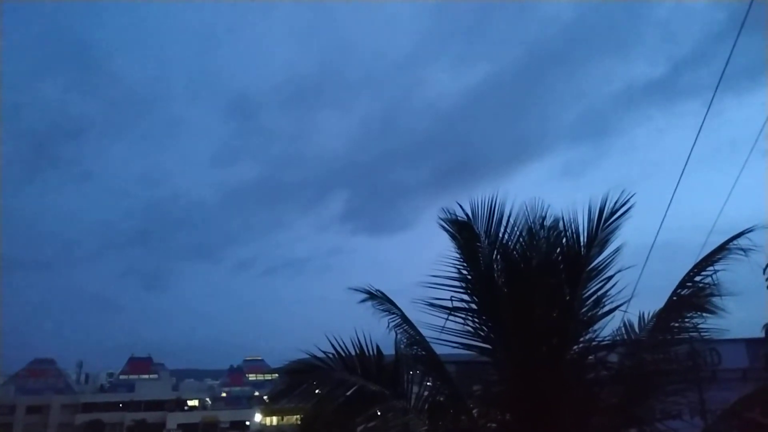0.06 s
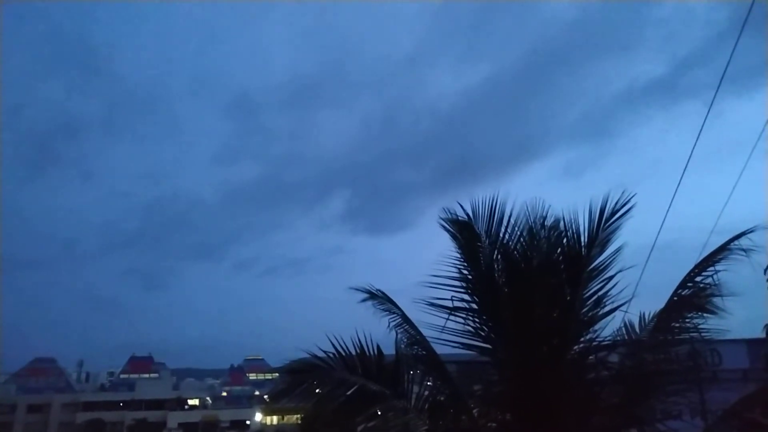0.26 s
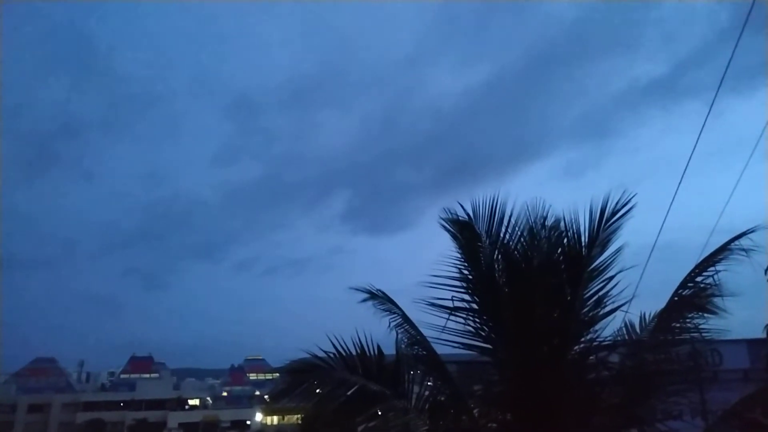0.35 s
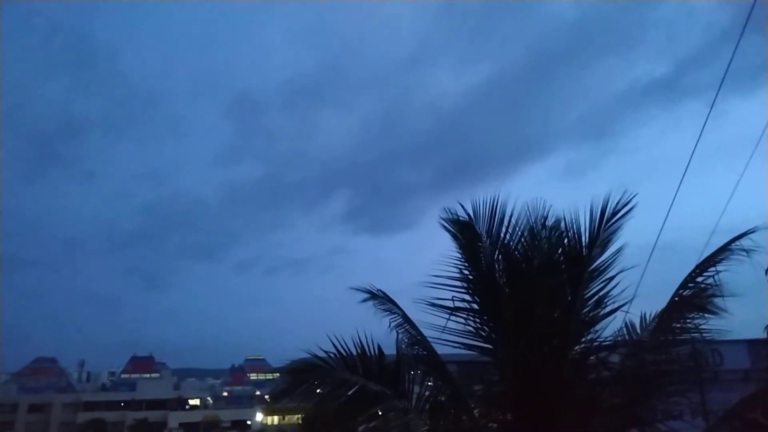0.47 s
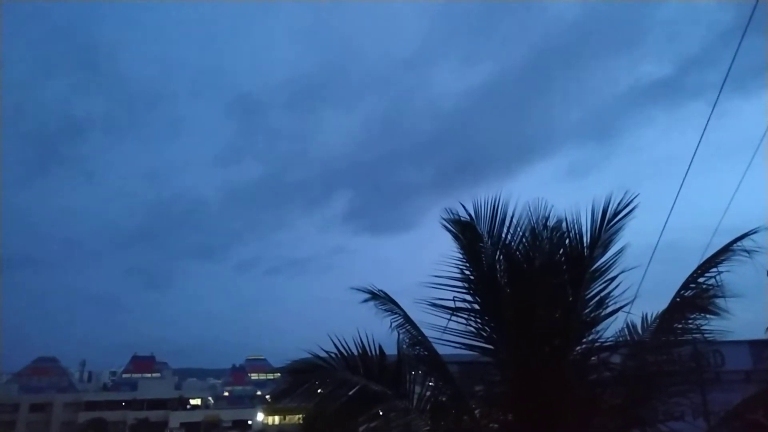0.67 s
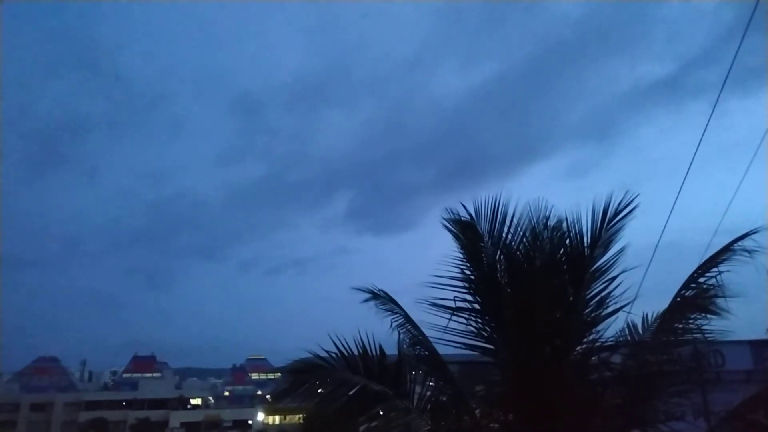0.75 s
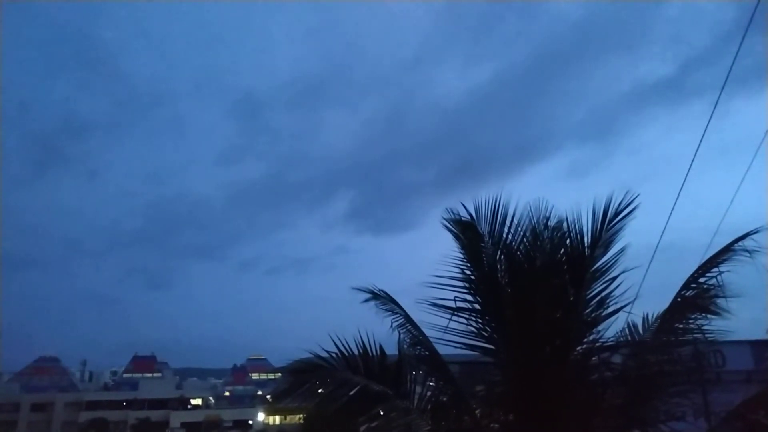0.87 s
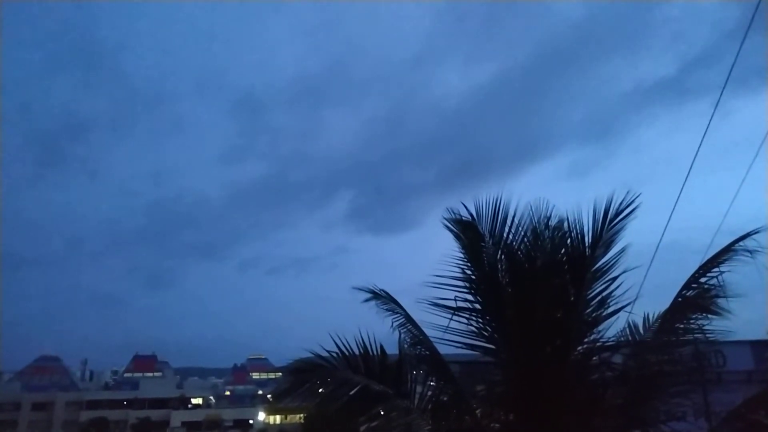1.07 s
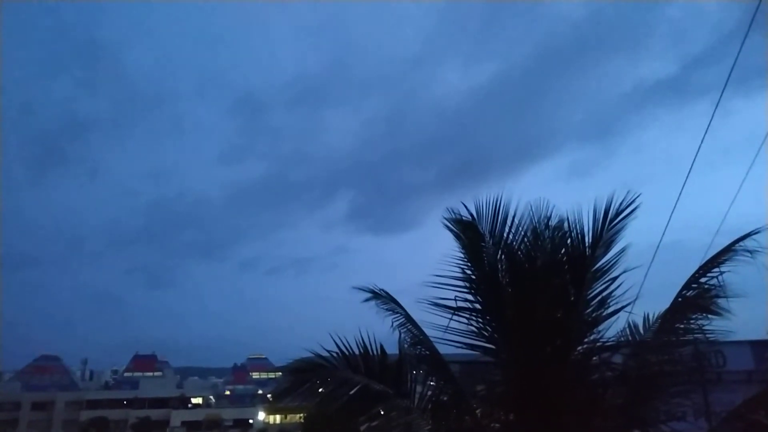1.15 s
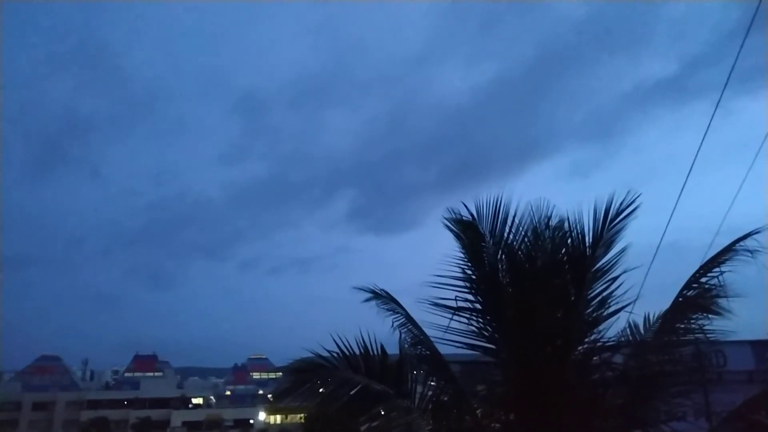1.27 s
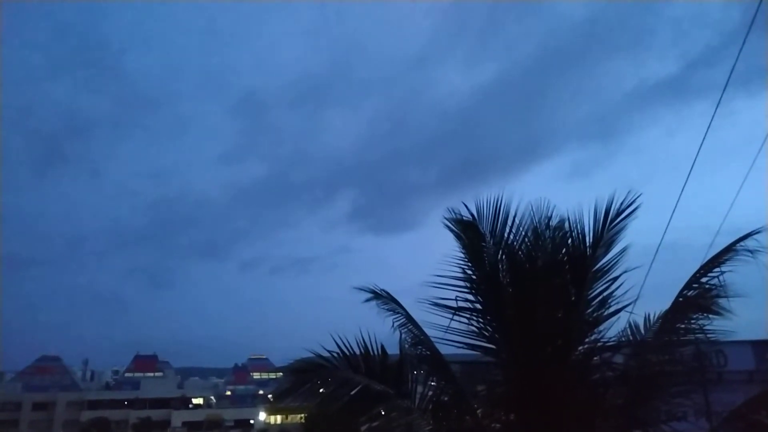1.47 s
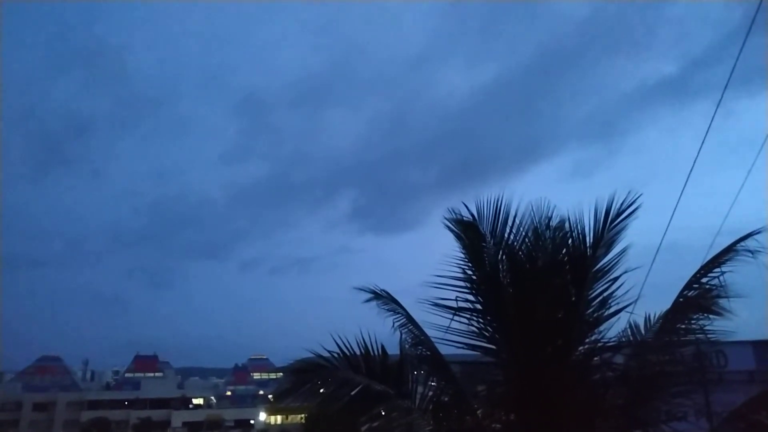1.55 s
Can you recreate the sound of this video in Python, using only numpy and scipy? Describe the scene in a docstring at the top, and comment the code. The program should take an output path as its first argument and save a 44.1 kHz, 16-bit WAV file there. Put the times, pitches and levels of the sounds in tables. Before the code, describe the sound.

One arching, echoing bird call outdoors, over thin bird whistles and a faint insect drone.

```python
"""Dusk over the rooftops, heard from one fixed microphone.
From the start the town hums low, insects shrill on the wing and small birds whistle thin slurs.
At 0.3 s a koel calls once, well in front: a held note that swells, arches up and falls away,
echoing among the houses. As it peaks, a husky bird answers from far off, half lost in its echo.
The small birds and the insects carry on to the end."""
import sys
import numpy as np
from scipy import signal
from scipy.fft import rfft, irfft
from scipy.io import wavfile

SR = 44100
rng = np.random.default_rng(int(sys.argv[2]) if len(sys.argv) > 2 else 0)


def to_wav(sig):
    """Store sig (one row per channel, or 1-D mono) as 16-bit WAV at the path in sys.argv[1].

    Samples outside -1..1 are clipped; the rate is SR.
    """
    pcm = np.clip(np.atleast_2d(sig), -1, 1) * 32767
    pcm = np.round(pcm).astype(np.int16)
    wavfile.write(sys.argv[1], SR, pcm.T)  # frames by channels


N = 70560
T = np.arange(N) / SR

# wash of the town and distant birdsong: (frequency [Hz], relative spectral level [dB])
TOWN_SPECTRUM = [(25, 0), (45, -2.5), (65, -7), (92, 0), (115, -4.5), (165, -2.5), (210, -12), (290, -16),
                 (400, -22.5), (800, -25), (1200, -24.5), (1550, -24), (2000, -25.5), (2850, -28),
                 (3300, -21), (3800, -18.5), (4450, -37.5), (5600, -25.5), (6400, -22.5), (7100, -31.5),
                 (7800, -37.5), (11000, -39.5), (15500, -41)]
# swell and ebb of the insect chorus: (time [s], relative level [dB])
INSECT_SWELL = [(0.0, -56.5), (0.258, -53), (0.436, -63), (0.494, -52.5), (0.672, -60), (0.842, -53.5),
                (0.98, -58), (1.122, -52.5), (1.256, -65.5), (1.27, -56), (1.38, -52), (1.466, -66),
                (1.528, -53), (1.6, -53)]
# bands the insects ring in: (centre [Hz], width [Hz], relative level [dB])
INSECT_BANDS = [(5100, 410, -1.5), (5096, 45, -5.5), (5173, 59, -5.5)]
# the small birds' whistles, one list a slur: (time [s], pitch [Hz], relative level [dB])
WHISTLE_SLURS = [
    [(0, 3300, -48), (.02, 3270, -84), (.06, 3690, -68), (.11, 3830, -66.5)],
    [(.125, 3950, -70), (.155, 4170, -54.5), (.195, 3730, -50), (.28, 3630, -51), (.36, 3520, -63),
     (.375, 3050, -58.5)],
    [(.38, 4000, -65), (.41, 4130, -63), (.44, 4000, -69)],
    [(.447, 3780, -53.5), (.49, 3350, -57.5), (.53, 3080, -57.5), (.58, 3280, -53.5)],
    [(.588, 3720, -57), (.622, 3270, -62), (.68, 3400, -58.5), (.73, 3400, -73), (.78, 3100, -62.5)],
    [(.82, 3970, -55.5), (.865, 3730, -47), (.915, 3600, -69)],
    [(.93, 3450, -54), (.97, 3230, -54.5), (.997, 3000, -66)],
    [(1.075, 3950, -63), (1.135, 3750, -70)],
    [(1.152, 4130, -58), (1.18, 3830, -51), (1.245, 4170, -51.5), (1.3, 3850, -47.5), (1.34, 3650, -56),
     (1.375, 3480, -59), (1.445, 3080, -60)],
    [(1.155, 3594, -65), (1.245, 3081, -75)],
    [(1.41, 3900, -63), (1.495, 4140, -62.5), (1.55, 3950, -64.5), (1.6, 3650, -66)],
]
# arch of the koel's note: (time [s], pitch [Hz])
KOEL_ARCH = [(.3, 1071), (.312, 1142), (.328, 1178), (.345, 1144), (.39, 1127), (.45, 1123), (.49, 1128),
             (.53, 1193), (.574, 1277), (.6, 1349), (.635, 1397), (.665, 1453), (.7, 1400), (.74, 1213),
             (.8, 990), (.87, 753.4)]
# the koel's loudness at the microphone, fluttering as reflections interfere with the note:
# (time [s], level [dB])
KOEL_LOUDNESS = [(.298, -80), (0.306, -59), (0.32, -49), (0.34, -53), (0.354, -42.5), (0.374, -49),
                 (.385, -48), (0.457, -49.5), (0.502, -41.5), (0.526, -48.5), (0.54, -40), (.552, -47.5),
                 (.575, -35), (.6, -39), (.637, -31.5), (0.682, -46), (0.699, -32), (0.738, -42.5),
                 (.8, -56), (0.862, -62), (0.884, -71)]
# overtones through throat and beak: (frequency [Hz], level against the fundamental [dB])
KOEL_RESONANCES = [(2200, -35), (3400, -63), (4300, -43), (5100, -52), (5700, -36), (6800, -31),
                   (7150, -35.5), (7700, -39), (8500, -39), (8800, -41), (9300, -37), (9950, -32.5),
                   (10200, -42.5), (11300, -50), (12300, -53), (13400, -45), (14300, -53), (15700, -47)]
# distinct echoes off blocks of houses: (delay [s], gain [dB])
FACADE_ECHOES = [(.035, -12), (0.126, -16), (.6, -25.5)]
# the far bird's notes: (time [s], length [s], start pitch [Hz], end pitch [Hz], relative level [dB])
FAR_GLIDES = [(0.659, .07, 1850, 1920, -64.5), (.73, 0.12, 2150, 2538, -65),
              (0.847, 0.073, 1805, 1990, -59), (.92, 0.089, 2322, 2475, -59.5),
              (1.02, 0.025, 2720, 2620, -66), (1.033, 0.099, 2121, 1582, -65.5),
              (1.169, 0.026, 1880, 2000, -69), (1.191, 0.041, 2015, 1739, -56),
              (1.27, .12, 2100, 2300, -66.5)]

NOTE_EDGE_S, FIRST_REFLECTION_S = 0.0034, 0.0046


def from_db(db):
    """Decibels to gain."""
    return 10 ** (np.asarray(db) / 20)


def unit_rms(x):
    """Scale to unit rms."""
    return x / np.sqrt(np.mean(x ** 2) + 1e-20)


def in_time(rows):
    """Each column after the time column as a curve over time."""
    times, *columns = np.transpose(rows)
    return [np.interp(T, times, column) for column in columns]


def coloured(gain_at):
    """Noise of unit rms whose spectrum follows a gain function."""
    hz = np.maximum(np.arange(N // 2 + 1) * SR / N, 1)
    spectrum = rfft(rng.standard_normal(N)) * gain_at(hz)
    return unit_rms(irfft(spectrum, N))


def noise_band(hz, width_hz):
    """Noise held in a steep resonance; a narrow one sounds as a wavering tone."""
    return coloured(lambda f: 1 / (1 + (2 * (f - hz) / width_hz) ** 4) ** .5)


def phase_of(hz, jitter, rate_hz):
    """Running phase of a pitch that wanders by the rms fraction `jitter`."""
    drift = coloured(lambda f: 1 / (1 + (f / rate_hz) ** 2))
    return 2 * np.pi * np.cumsum(hz * (1 + jitter * drift)) / SR


def gate(start, end, edge_s):
    """Soft opening and closing of a note."""
    return np.clip(np.minimum(T - start, end - T) / edge_s + .5, 0, 1)


def echoes(x, t60_s):
    """Dense dying reflections that reach the microphone after a short gap."""
    onset = np.clip(T / FIRST_REFLECTION_S - 1, 0, 1)
    response = rng.standard_normal(N) * from_db(-60 * T / t60_s) * onset
    response /= np.sqrt(np.sum(response ** 2))
    return signal.fftconvolve(x, response)[:N]


def town(wash_db=-56.5, hum_db=-60.5, low_cut_hz=10):
    """The bed of the place: a steady outdoor wash with a low hum."""
    hz, db = np.transpose(TOWN_SPECTRUM)

    def wash_gain(f):
        low_cut = f ** 2 / (f ** 2 + low_cut_hz ** 2)
        return from_db(np.interp(np.log(f), np.log(hz), db)) * low_cut

    wash = coloured(wash_gain)
    hum = noise_band(hz=150.4, width_hz=6.9)
    return from_db(wash_db) * wash + from_db(hum_db) * hum


def insects(gain_db=-2, pulse_depth=0.14):
    """Many wings ring near one pitch in quick uneven pulses; the chorus swells and ebbs."""
    db, = in_time(INSECT_SWELL)
    chorus = sum(from_db(level) * noise_band(hz, width) for hz, width, level in INSECT_BANDS)
    pulses = 1 + pulse_depth * noise_band(hz=91, width_hz=140)
    return from_db(db + gain_db) * unit_rms(chorus * pulses)


def small_birds(gain_db=2, echo_db=-2):
    """Thin slurred whistles, smeared by short reflections on their way to the microphone."""
    song = 0
    for slur in WHISTLE_SLURS:
        hz, db = in_time(slur)
        envelope = from_db(db + gain_db) * gate(slur[0][0], slur[-1][0], edge_s=0.014)
        song += envelope * np.sin(phase_of(hz, jitter=0.01553, rate_hz=210))
    return song + from_db(echo_db) * echoes(song, t60_s=0.23)


def koel(houses_db=-12.5, overtone_echo_db=4, low_echo_db_per_octave=3.5):
    """Foreground: a nearly pure glide whose faint raspy overtones sweep the throat's resonances."""
    hz, = in_time(KOEL_ARCH)
    db, = in_time(KOEL_LOUDNESS)
    opening = gate(KOEL_LOUDNESS[0][0], KOEL_LOUDNESS[-1][0], NOTE_EDGE_S)
    envelope = np.sqrt(2) * from_db(db) * opening
    tone = envelope * np.sin(phase_of(hz, jitter=0.0014, rate_hz=39))
    rasp_phase = phase_of(hz, jitter=0.0066, rate_hz=550)
    throat_hz, throat_db = np.transpose(KOEL_RESONANCES)
    overtones = 0
    for k in range(2, 14):
        throat_gain = from_db(np.interp(k * hz, throat_hz, throat_db))
        overtones += envelope * throat_gain * np.sin(k * rasp_phase)
    # the low parts of the call echo most
    reflected = tone * from_db(low_echo_db_per_octave * np.log2(hz.max() / hz))
    tone_echo = from_db(houses_db) * houses(reflected) + facades(reflected)
    overtone_echo = from_db(overtone_echo_db) * echoes(overtones, t60_s=0.71)
    return tone + overtones + tone_echo + overtone_echo


def houses(x, street_db=-2.5):
    """Quick reflections from near walls and a long tail from the streets."""
    return echoes(x, t60_s=0.31) + from_db(street_db) * echoes(x, t60_s=2.14)


def facades(x):
    """Blocks of houses, near and far, throw the call back late, blurred by their rough walls."""
    blurred = echoes(x, t60_s=0.35)
    return sum(from_db(db) * np.interp(T - delay, T, blurred, left=0) for delay, db in FACADE_ECHOES)


def far_bird(gain_db=1, echo_db=1.5):
    """Short husky glides from far off, half lost in their echo."""
    song = 0
    for start, length, start_hz, end_hz, db in FAR_GLIDES:
        end = start + length
        hz = np.interp(T, [start, end], [start_hz, end_hz])
        envelope = from_db(db + gain_db) * gate(start, end, NOTE_EDGE_S)
        song += envelope * np.sin(phase_of(hz, jitter=.06, rate_hz=170.6))
    return song + from_db(echo_db) * echoes(song, t60_s=0.91)


def scene():
    """Near and far sources meet at one microphone over the rooftops."""
    return (town() + insects() + small_birds() + koel() + far_bird())[None]


def record(dry):
    """The microphone's highest treble is cut steeply."""
    cutoff_hz = 15700
    low_pass = signal.ellip(12, .1, 80, cutoff_hz, fs=SR, output="sos")
    return signal.sosfilt(low_pass, dry)


dry = scene()
out = record(dry)
to_wav(out)
```